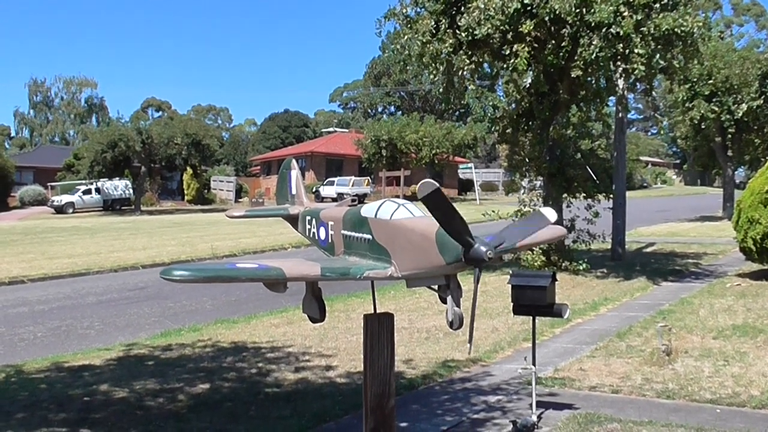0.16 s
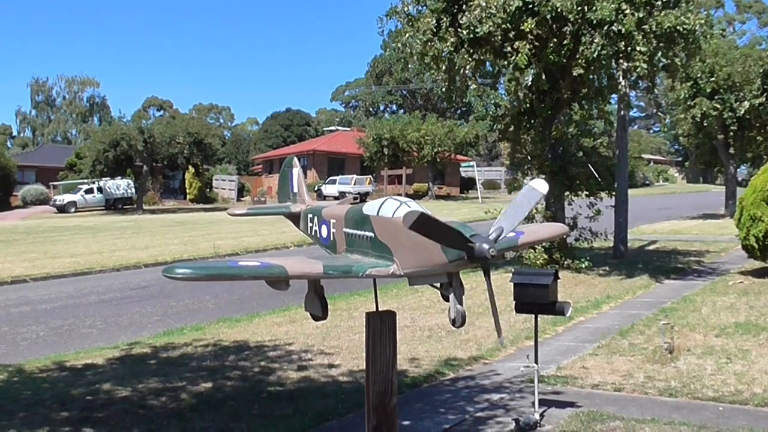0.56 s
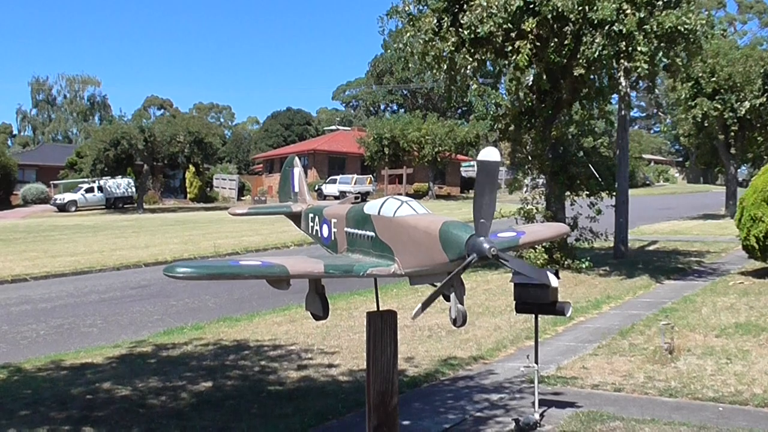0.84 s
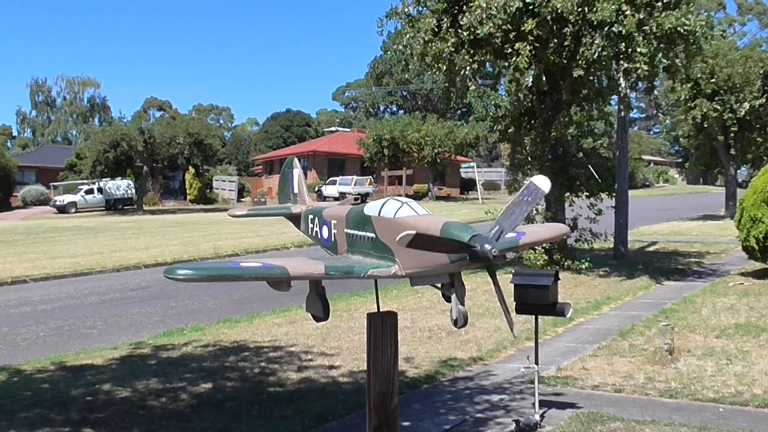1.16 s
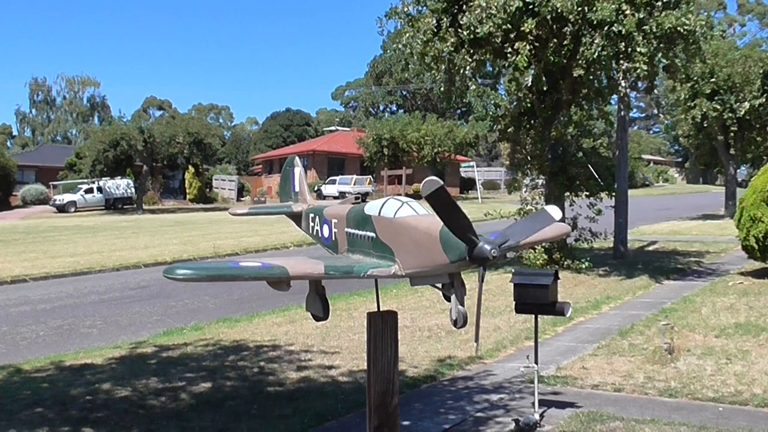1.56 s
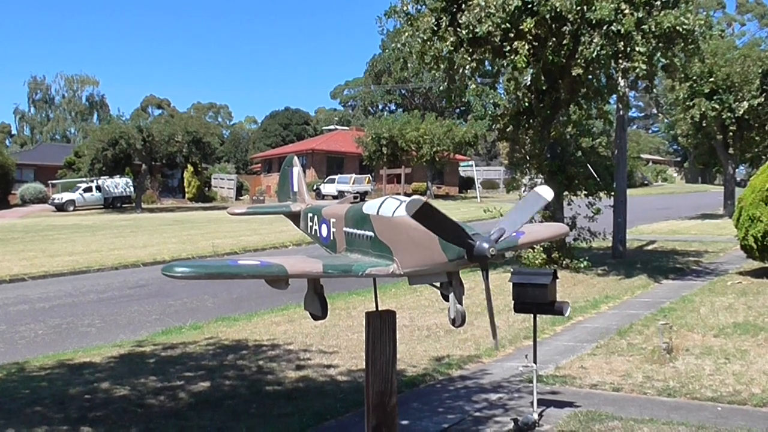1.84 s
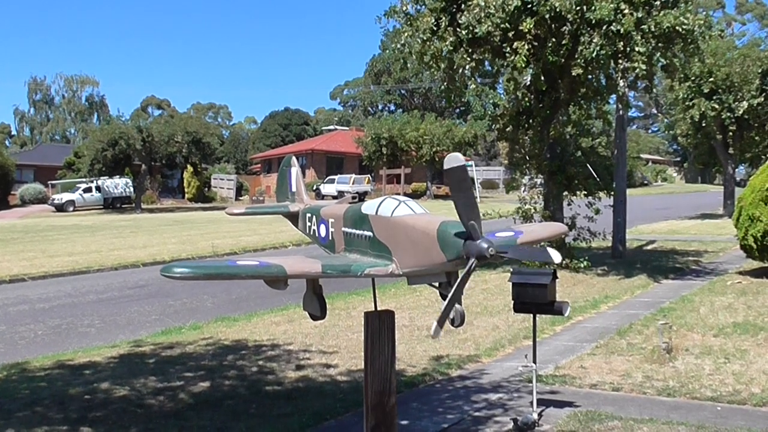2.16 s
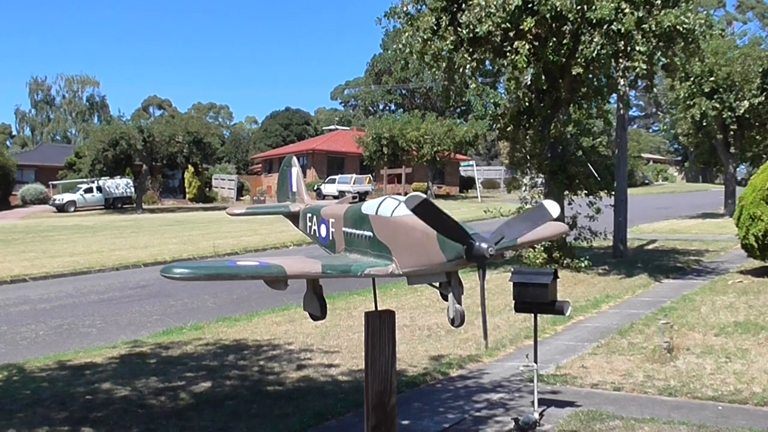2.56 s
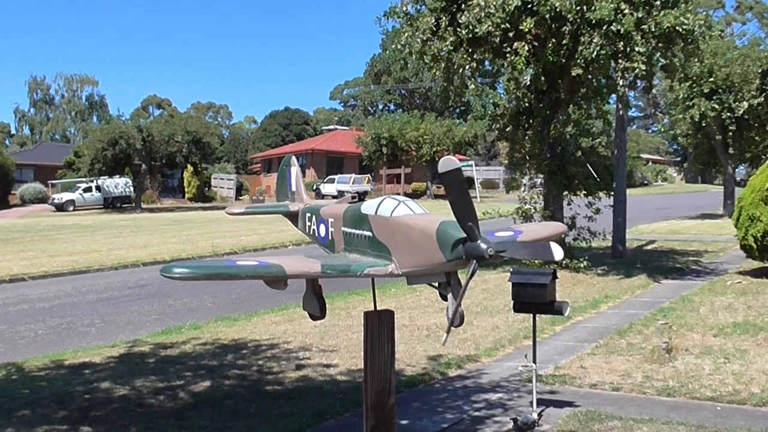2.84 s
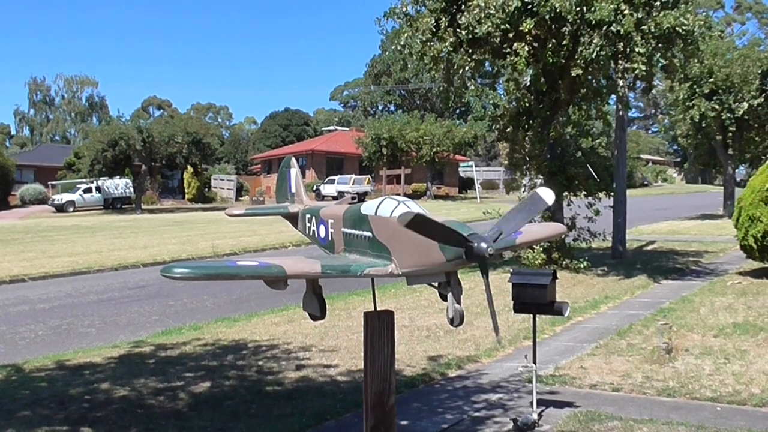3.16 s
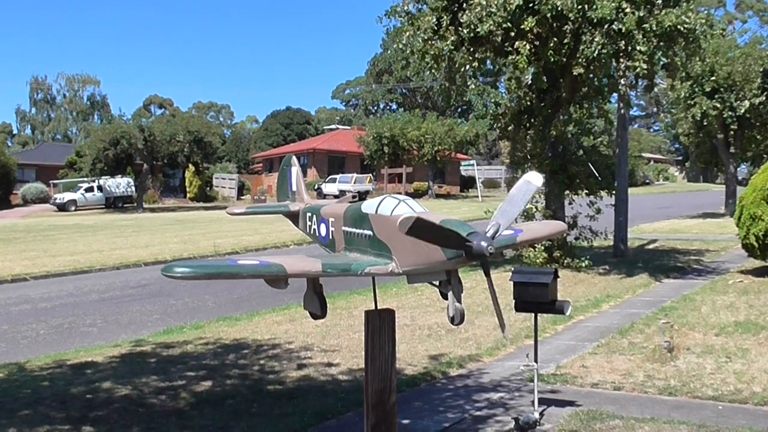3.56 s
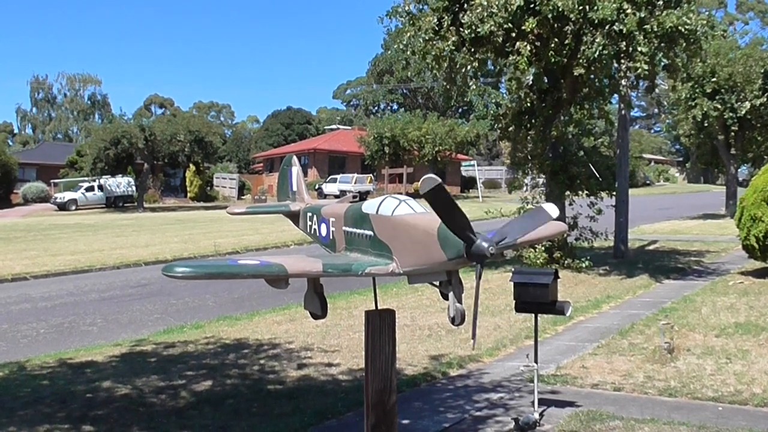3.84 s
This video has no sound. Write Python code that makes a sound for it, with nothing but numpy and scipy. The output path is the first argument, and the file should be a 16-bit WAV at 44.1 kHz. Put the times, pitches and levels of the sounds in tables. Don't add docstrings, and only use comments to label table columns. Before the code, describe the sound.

Gusty wind thumps and rumbles on the microphone, with dry wooden rattling from a spinning toy propeller

```python
import sys
import numpy as np
from scipy import signal
from scipy.fft import rfft, irfft, next_fast_len
from scipy.io import wavfile
from scipy.ndimage import uniform_filter1d, map_coordinates

SR = 44100
rng = np.random.default_rng(int(sys.argv[2]) if len(sys.argv) > 2 else 0)


def log_audio(samples):
    frames = np.atleast_2d(samples).T
    limited = np.clip(frames, -1, 1)
    pcm = np.round(limited * 32767).astype(np.int16)
    wavfile.write(sys.argv[1], SR, pcm)


def boost_factor(decibels):
    exponent = np.asarray(decibels, float) / 20
    return 10 ** exponent


N = 176400


def unit(x):
    return x / np.sqrt(np.mean(x ** 2) + 1e-20)


def along(points, hz):
    point_hz, value = np.transpose(points)
    return np.interp(np.log(hz + 1), np.log(point_hz + 1), value)


def curves(rows):
    start_s, *columns = np.transpose(rows)
    return [np.interp(np.arange(N) / SR, start_s, column) for column in columns]


def wobble(rate_hz):
    return map_coordinates(rng.standard_normal(400), [np.arange(N) * rate_hz / SR])


def filtered(x, response):
    size = next_fast_len(N + SR // 2)
    hz = np.fft.rfftfreq(size, 1 / SR)
    return irfft(rfft(x, size) * response(hz), size)[..., :N]


def add(out, start_s, sound):
    k = round(start_s * SR)
    out[:, k:k + sound.shape[1]] += sound


def panned(pan_db):
    return boost_factor(np.array([pan_db / 2, -pan_db / 2]))


def narrowed(x, side_points):
    mid = x.mean(0)
    side = (x[0] - x[1]) / 2 * boost_factor(curves(side_points)[0])
    return np.array([mid + side, mid - side])


EVEN_S, EVEN_SHARE = 0.0157, 0.66


def swing(spectrum):
    x = unit(filtered(rng.standard_normal((2, N)), lambda hz: boost_factor(along(spectrum, hz))))
    power = np.abs(uniform_filter1d(x ** 2, size=int(EVEN_S * SR)))
    x = x / (power + 0.041) ** (EVEN_SHARE / 2)
    return unit(filtered(x, lambda hz: boost_factor(0.43 * along(spectrum, hz))))


# [dB, left over right]
WIND = [(0,-52,10),(.15,-39,0),(.45,-30,-1.5),(.7,-37,1),(.78,-76,16),(1.3,-39.5,-4.5),(1.42,-27.5,0),(1.62,-34.5,-8.5),(1.72,-27.5,0.5),(2.07,-33,-6.5),(2.2,-39.5,17.5),(2.31,-58,-19),(2.53,-29,9),(2.72,-22.5,0.5),(3.25,-31.5,-2.5),(3.58,-26,-9.5),(3.71,-34,1),(4,-30,3)]
# start_s [s], likeness [-1..1]
PORT_LIKENESS = [(1.56, -.7), (1.66, .1)]
# hz [Hz], level_db [dB per Hz]
DULL = [(20, -19.5), (50, -4), (90, -2), (170, -3.5), (260, -9), (400, -41), (900, -66)]
# hz [Hz], level_db [dB per Hz]
BRIGHT = [(40, -37), (110, -5.5), (250, 1), (380, -2.5), (600, -12.5), (1500, -34.5), (3000, -64)]
# hz [Hz], level_db [dB per Hz]
RIP = [(350, -4.5), (600, 8), (1200, -4), (2600, -16.5)]
BRIGHT_AT_DB, BRIGHT_GROWS = -24, 1
RIP_DB, RIP_GROWS = -31.5, 1.64
EDDY_SHARE = 0.92
LUMP_DB = 2.6


def buffeting():
    wind_db, pan_db = curves(WIND)
    port_lumps = np.array([wobble(18), wobble(18)])
    lumps_db = LUMP_DB * (0.8 * wobble(35) + 0.35 * port_lumps)
    turn = np.arccos(np.clip(curves(PORT_LIKENESS)[0], -1, 1)) / 2
    eddy_power, ragged_power, whirl = eddies(turn)

    flow_power = (boost_factor(wind_db + lumps_db) * panned(pan_db)) ** 2
    gain = np.sqrt(flow_power + ragged_power)
    over_db = 10 * np.log10(np.mean(flow_power + eddy_power, axis=0)) - BRIGHT_AT_DB
    wind_over_db = wind_db - BRIGHT_AT_DB
    bright_db = BRIGHT_GROWS * (EDDY_SHARE * over_db + (1.5 - EDDY_SHARE) * wind_over_db)
    tilt = boost_factor(bright_db)

    rumble = (swing(DULL) + tilt * swing(BRIGHT)) / np.sqrt(1 + tilt ** 2)
    common, opposed = rumble + boost_factor(RIP_DB + RIP_GROWS * over_db) * swing(RIP)
    common, opposed = np.cos(turn) * common, np.sin(turn) * opposed
    ports = whirl + gain * np.array([common + opposed, common - opposed])
    return filtered(ports, lambda hz: 1 / (1 + (hz / 2600) ** 6))


# hz [Hz], likeness [0..1]
ALIKE = [(60, 0.75), (380, 0.99), (2400, 0.89), (6000, 0.9), (9000, 0.17), (15000, 0.1)]


def rush(spectrum, patchy_db):
    z = signal.stft(rng.standard_normal((2, N)), nperseg=512)[2]
    field = uniform_filter1d(rng.standard_normal(z.shape[1:]), size=6, axis=0)
    field = uniform_filter1d(field, size=12, axis=1)
    pair = signal.istft(z * boost_factor(patchy_db * unit(field)), nperseg=512)[1][:, :N]

    def mid_side_response(hz):
        turn = np.arccos(np.clip(along(ALIKE, hz), -1, 1)) / 2
        return boost_factor(along(spectrum, hz)) * np.array([np.cos(turn), np.sin(turn)])

    mid, side = filtered(pair, mid_side_response)
    return unit(np.array([mid + side, mid - side]))


# hz [Hz], level_db [dB per Hz]
LEAVES = [(1500, -49), (3000, -7), (3700, -4), (5200, 1), (6000, -3.5), (7500, -8), (11000, -14.5),
          (15800, -24)]
# start_s [s], level_db [dB]
RUSTLE = [(0.0, -58), (2.52, -54), (4.0, -55.5)]


def leaves():
    level_db = curves(RUSTLE)[0] + 1 + 0.14 * wobble(4.95)
    return boost_factor(level_db) * rush(LEAVES, patchy_db=0.8)


# hz [Hz], level_db [dB per Hz]
TRAFFIC = [(25, -7.5), (60, 3), (300, -7.5), (630, -2), (1100, -6), (1500, -13), (2600, -23.5),
           (4500, -45.5)]
# start_s [s], side_db [dB]
TRAFFIC_WIDTH = [(1.5, 3), (1.65, -8)]
TRAFFIC_DB = -44.5


def traffic():
    level_db = TRAFFIC_DB + 0.093 * wobble(1.0)
    return boost_factor(level_db) * narrowed(rush(TRAFFIC, patchy_db=-0.5), TRAFFIC_WIDTH)


# start_s [s], peak_db [dB], pan_db [dB, left over right], length_s [s], pitch_hz [Hz]
EDDIES = [(0.164,-31,-6,0.028,103),(.239,-27,5.5,0.027,131),(0.364,-23.5,-4,0.049,214),(.422,-23,-10,0.017,167),(0.505,-19.5,1,0.03,92),
          (0.649,-30,-3.5,0.035,64),(.984,-27.5,0,0.038,90),(1.024,-20.5,-5,0.016,115),(1.353,-20.5,3,0.021,170),(1.445,-29,5,0.05,234),
          (1.515,-11,3,0.0064,198),(1.664,-20.5,0,0.023,98),(1.73,-27,-1,0.03,102),(1.793,-26.5,-8,0.024,205),(1.879,-27.5,4,0.026,115),
          (1.938,-22.5,-10,0.047,150.4),(2.001,-27,-16.5,0.019,147),(2.053,-30,-12,0.016,87.4),(2.348,-25.5,-3.5,0.058,145.7),
          (2.46,-26,-5,0.019,120),(2.574,-17.5,6.5,0.058,112.3),(2.664,-17.5,11.5,0.0073,263),(2.734,-22.5,3,0.029,198),(2.791,-22,-7,0.038,257),
          (2.855,-16,0.5,0.025,266),(2.9,-14,-4.5,.015,133),(2.903,-14.5,4,0.0081,290),(3.052,-24.5,15.5,0.012,179),(3.13,-19.5,0,0.021,198),(3.345,-23.5,-7,0.034,130),
          (3.385,-23.5,4.5,0.01,195),(3.462,-22,4,0.033,141),(3.499,-17.5,3,0.023,195),(3.558,-22.5,2,0.012,197),
          (3.603,-29,11,0.031,108),(3.755,-24.5,1,0.013,130),(3.777,-14,0,0.033,124.4),(3.782,-13,5.5,0.0079,287),(3.846,-32,9,0.032,86),(3.985,-31.5,-3,0.018,207)]
WHIRL_SAG = 0.25
WHIRL_SHARE, WHIRL_TURNS = 0.7, 4


def eddies(turn):
    t = np.arange(N) / SR
    power, ragged, whirl = np.zeros((3, 2, N))
    phases = rng.random(len(EDDIES))
    for (start_s, peak_db, pan_db, length_s, pitch_hz), phase in zip(EDDIES, phases):
        k = slice(round((start_s - length_s) * SR), min(N, round((start_s + 3 * length_s) * SR)))
        u = (t[k] - start_s) / length_s
        rise = np.sin(np.pi / 2 * np.clip(u * 3 + 0.5, 0, 1)) ** 2
        fall = np.exp(-np.clip(u - 0.6, 0, 9) ** 2 * 4)
        size = boost_factor(peak_db) * panned(pan_db)[:, None] * rise * fall
        cycles = phase + pitch_hz * length_s * (u - WHIRL_SAG * (u - 0.5) ** 2 / 2)
        share = WHIRL_SHARE * min(1, WHIRL_TURNS / (pitch_hz * length_s))
        power[:, k] += size ** 2
        ragged[:, k] += (1 - share) * size ** 2
        port_phase = np.array([turn[k], -turn[k]])
        whirl[:, k] += np.sqrt(2 * share) * size * np.sin(2 * np.pi * cycles + port_phase)
    return power, ragged, whirl


# [dB, treble share]
TICKS = [(0.8955, -34, -21), (0.906, -35.5, -21), (0.913, -37, -14), (0.941, -30.5, -26),
         (1.0936, -34, -17), (1.1263, -39, -19), (1.1677, -32.5, -29), (1.186, -33.5, -20),
         (1.192, -27.5, -13), (2.0142, -36.5, -29), (2.0308, -42, -12), (2.0598, -26, -24),
         (2.0766, -25.5, -14), (2.0844, -38, -21), (2.134, -25, -16), (2.151, -21.5, -17),
         (2.1624, -27, -21), (2.1798, -35, -20), (2.2082, -32.5, -5), (2.2114, -30.5, -17),
         (2.2353, -29, -27), (2.254, -31, -19), (2.2626, -31, -26), (2.2796, -30, -15),
         (2.2883, -26.5, -13), (2.2947, -40, -12),
         (2.3223, -35.5, -22), (2.336, -34, -21), (2.3448, -29, -24), (2.3588, -22.5, -8),
              (2.38, -26.5, -12), (2.3864, -37, -4), (2.397, -20, -13), (2.414, -25, -14),
              (2.423, -28, -25), (2.4588, -33, -9), (2.4727, -26.5, -5), (2.4843, -22, -11),
              (2.5039, -25.5, -18), (2.5137, -29.5, -3), (2.534, -32, -11), (2.6004, -37, -18),
              (2.61, -31, -19), (2.6224, -32.5, -19), (2.6413, -36.5, -17), (2.6845, -38, -13),
              (2.7077, -26.5, -16), (2.7618, -33, -9),
         (3.0577, -41, -20), (3.0653, -37, -12), (3.1144, -39, -18), (3.1947, -34, -23),
             (3.21, -40, -22), (3.2675, -40, -26), (3.2827, -43, -14), (3.352, -36, -14), (3.3674, -34, -8),
             (3.3763, -26, -11), (3.4378, -34.5, -21), (3.452, -42, -14), (3.569, -37, -18),
             (3.5754, -34.5, -14), (3.6334, -40, -18)]
# hz [Hz], level_db [dB], t60_s [s]
SHAFT = [(3050, -8, 0.017), (4220, -10, 0.011), (4960, -4, 0.014), (5530, -0.5, 0.013), (6340, -9, 0.0089),
         (8500, 2.5, 0.0091), (8520, 0.5, 0.0092), (11300, -5, 0.0064)]
TICK_DB, CRACK_DB, CRACK_T60_S = -8.5, -2.5, 0.0076
CHATTER_S, CHATTER_DB = 0.014, -13
MODE_SCATTER_DB, MODE_DRIFT = 3, 0.06
TREBLE_AT_DB, TREBLE_GROWS = -9.5, 0.69
TICK_PAN_DB, TICK_LAG_S = 6, 2.5e-5
TOP_HZ = 10500


def rattle():
    out = np.zeros((2, N + SR))
    t = np.arange(SR // 20) / SR
    hz, level_db, t60_s = np.transpose(SHAFT)[:, :, None]
    treble_side = np.where(hz > 7000, 0.5, -0.5)
    lag_s = np.array([0, TICK_LAG_S])[:, None, None] * (hz > 7000)
    pan_db = np.array([1, -1])[:, None, None] * TICK_PAN_DB / 2
    sides = boost_factor(pan_db * np.minimum(hz / 8500, 1) ** 3)
    attack = 1 - np.exp(-t / 0.0002)

    ticks = TICKS
    rebounds = [(s + CHATTER_S * rng.random(), db + CHATTER_DB, treble) for s, db, treble in ticks]
    ticks = ticks + rebounds
    for start_s, peak_db, treble_db in ticks:
        scatter, drift, phase = rng.standard_normal((3, len(hz), 1))
        tilt_db = TREBLE_GROWS * (treble_db - TREBLE_AT_DB) * treble_side
        mode_gain = boost_factor(level_db + tilt_db + MODE_SCATTER_DB * scatter - 60 * t / t60_s)
        mode_hz = hz * (1 + MODE_DRIFT * drift)
        ring = mode_gain * np.sin(2 * np.pi * mode_hz * (t - lag_s) + phase)
        shared = rng.standard_normal(len(t)) * np.array([[1.2], [0.8]])
        crack_noise = shared + 0.13 * rng.standard_normal((2, len(t)))
        crack = boost_factor(CRACK_DB - 60 * t / CRACK_T60_S) * crack_noise
        add(out, start_s, boost_factor(peak_db + TICK_DB) * ((sides * ring).sum(1) + crack) * attack)

    def band(f):
        return f ** 4 / (f ** 4 + 2300. ** 4) / np.sqrt(1 + (f / TOP_HZ) ** 10)

    return filtered(out[:, :N], band)


ECHO_DB, ECHO_T60_S = -19.5, 0.064


def yard(x):
    t = np.arange(SR // 5) / SR
    tail = rng.standard_normal((2, len(t))) * boost_factor(-60 * t / ECHO_T60_S) * (t > 0.004)
    return boost_factor(ECHO_DB) * signal.fftconvolve(x, tail / np.linalg.norm(tail[0]), axes=1)[:, :N]


# start_s [s], level_db [dB], length_s [s], spot_hz [Hz]
KNOCKS = [
    (2.143, -39.5, 0.048, 1050),
    (2.264, -41, 0.02, 1450),
    (2.441, -39.5, 0.076, 1090),
    (2.536, -37.5, 0.029, 1400),
    (2.631, -40, 0.047, 1450),
]
# hz [Hz], width_hz [Hz], level_db [dB]
WOOD = [(1050, 16, 1), (1445, 58, -5), (1770, 42, -17), (2120, 23, -10), (2280, 32, -11)]
KNOCK_FOCUS_DB = 6.9


def knocks():
    t, out = np.arange(N) / SR, 0
    for start_s, level_db, length_s, spot_hz in KNOCKS:
        swell = np.sin(np.pi * np.clip((t - start_s) / length_s, 0, 1) ** 0.5) ** 2
        push = boost_factor(level_db) * swell * rng.standard_normal(N)

        def wood(f):
            total = 0
            for hz, width_hz, mode_db in WOOD:
                gain = boost_factor(mode_db - KNOCK_FOCUS_DB * abs(np.log2(hz / spot_hz)))
                damping = 1j * f * (width_hz + 30)
                total = total + gain * damping / (hz * hz - f * f + damping)
            return total / (1 + (f / 2700) ** 8)

        out = out + filtered(push, wood)
    return 14 * out


# start_s [s], length_s [s], level_db [dB], from_hz [Hz], to_hz [Hz]
WHISTLES = [
    (2.782, 0.057, -63, 2694, 2440),
    (2.842, 0.017, -56, 2510, 2380),
    (2.866, 0.028, -54.5, 2450, 2440),
    (3.008, 0.025, -60, 2470, 2440),
    (3.058, 0.064, -64, 2250, 2400),
    (3.264, 0.018, -51.5, 1980, 2140),
    (3.281, 0.021, -57, 2200, 2120),
    (3.305, .04, -64, 2100, 2120),
    (3.885, 0.094, -59, 1660, 1770),
]


def bird():
    out = np.zeros((1, N + SR))
    waver_cycles = np.cumsum(22 * wobble(95)) / SR
    for start_s, length_s, level_db, from_hz, to_hz in WHISTLES:
        u = np.arange(round(length_s * SR)) / (length_s * SR)
        cycles = length_s * (from_hz * u + (to_hz - from_hz) * u ** 2 / 2)
        cycles = cycles + waver_cycles[round(start_s * SR):][:len(u)]
        tone = np.sin(2 * np.pi * cycles) * np.sin(np.pi * u) ** 0.46
        add(out, start_s, boost_factor(level_db + 4.5) * tone[None])
    return out[:, :N] * boost_factor(3 * wobble(95))


def scene():
    yard_sounds = rattle() + knocks() + bird()
    return buffeting() + yard_sounds + yard(yard_sounds) + leaves() + traffic()


def band_limit(x):
    return signal.sosfilt(signal.butter(12, 16430, fs=SR, output="sos"), x)


# start_s [s], side_db [dB]
WIDTH = [(2.6,-3),(2.72,-14),(2.88,-19),(2.91,-83),(3.05,-79),(3.08,-26),(3.8,-17.5),(3.84,-76),(3.9,-63),(3.92,-29)]


def record(dry):
    mix = filtered(narrowed(dry, WIDTH), lambda hz: hz < 15830)
    return band_limit(mix)


dry = scene()
out = record(dry)
log_audio(out)
```